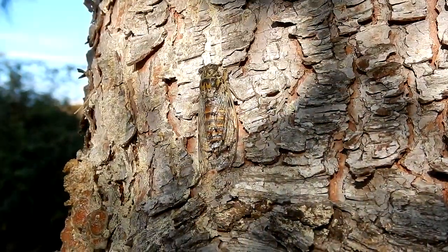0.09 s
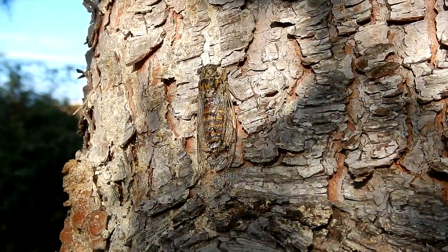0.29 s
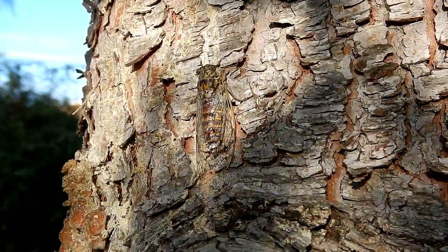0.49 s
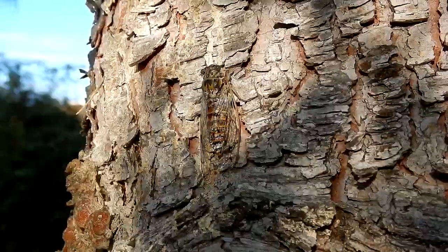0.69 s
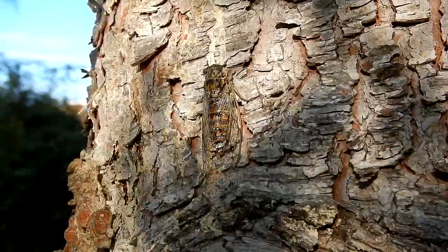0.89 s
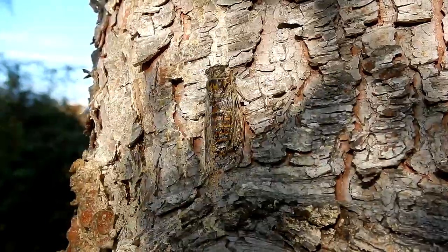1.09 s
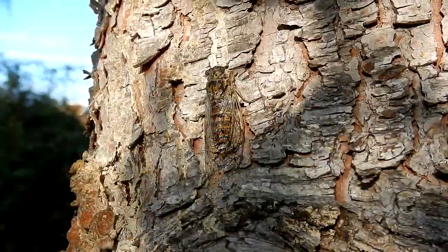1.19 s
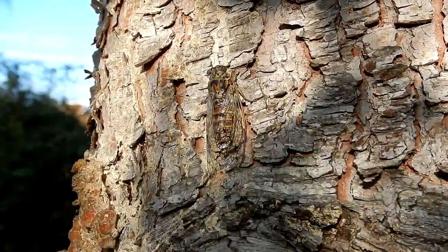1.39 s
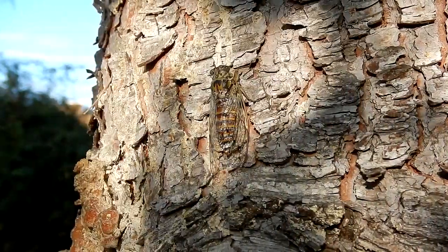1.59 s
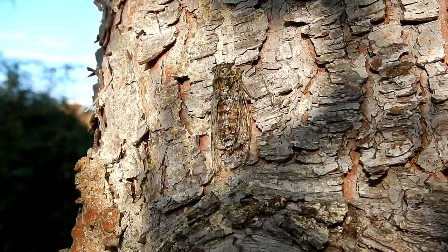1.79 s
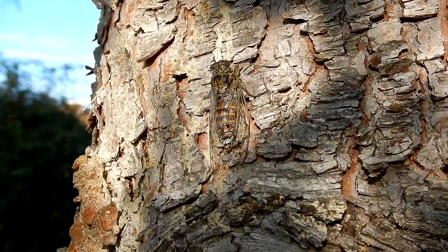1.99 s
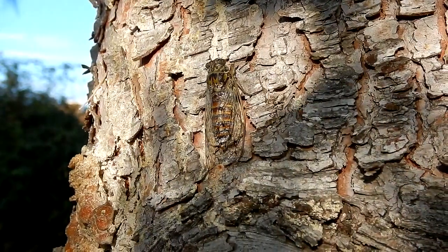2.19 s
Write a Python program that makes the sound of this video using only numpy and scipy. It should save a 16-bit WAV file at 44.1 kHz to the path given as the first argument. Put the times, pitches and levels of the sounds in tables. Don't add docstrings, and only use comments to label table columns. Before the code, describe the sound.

Five brief raspy cicada chirps, close and piercing, evenly spaced over a very faint outdoor haze

```python
import sys
import numpy as np
from scipy import signal
from scipy.fft import rfft, irfft
from scipy.io import wavfile

SR = 44100
rng = np.random.default_rng(int(sys.argv[2]) if len(sys.argv) > 2 else 0)


def persist_wave(psi):
    counts = np.round(np.clip(psi, -1, 1) * 32767).astype(np.int16)
    wavfile.write(sys.argv[1], SR, np.atleast_2d(counts).T)


def makeup_ratio(level_db):
    decades = np.asarray(level_db, float) / 20
    return 10 ** decades


N = 97020

CHIRP_S = [.2100, .6092, 1.0258, 1.4207, 1.8142]
# (length/s, level/dB, belly level/dB, last ring level/dB)
CHIRPS = [
    (0.092, -17, 0.5, -15.5),
    (.087, -17.5, 2, -21),
    (0.093, -17.5, 1, -20),
    (.085, -18, 2.5, -3.5),
    (0.092, -17.5, -1.5, -30.5),
]
HUM_HZ, HUM_T60_S = 5000, .043


def at_hz(points, hz):
    table_hz, values = np.array(points).T
    return np.interp(np.log(hz), np.log(table_hz), values)


def drift(rate_hz):
    r = np.exp(-80 * np.pi * rate_hz / SR)
    slow = signal.lfilter([1], [1, -2 * r, r * r], rng.standard_normal(N // 40 + 2002))
    slow = slow[2000:]
    return np.interp(np.arange(N) / 40, np.arange(len(slow)), slow / slow.std())


def ring(clicks, hz, t60):
    r = makeup_ratio(-60 / (t60 * SR))
    w = 2 * np.pi * hz / SR
    return signal.lfilter([0, np.sin(w)], [1, -2 * r * np.cos(w), r * r], clicks + 1e-18)


def band(x, low_hz, top_hz, order):
    return signal.sosfilt(signal.butter(order, [low_hz, top_hz], "band", fs=SR, output="sos"), x)


def train(s, heights):
    return np.bincount((s * SR).astype(int), heights, N)[:N]


def cicada():
    # (f/Hz, level/dB, t60/s)
    main_modes = [
        (4263, 2.5, .012),
        (4635, 1, .011),
        (5123, 1, .013),
        (5517, -1, 0.012),
        (5525, -3.5, 0.0094),
    ]
    bright_modes = [
        (5806, -11.5, 0.0073),
        (6460, -10, 0.0047),
        (6963, -16, 0.009),
        (7930, -35.5, 0.0064),
    ]
    belly_modes = [
        (1982, -21, 0.01),
        (2269, -19.5, .02),
        (2741, -21, .018),
        (2990, -28, .012),
    ]
    sustain_db, top_hz = -11.5, 8800

    s, db, belly_db, bright_db, tilt_db, spread_db = tymbal_clicks()
    main = body(s, db, main_modes, spread_db, tilt_db) + last_ring()
    hum_kicks = makeup_ratio(db + sustain_db) * rng.standard_normal(len(s))
    main = main + ring(train(s, hum_kicks), HUM_HZ, HUM_T60_S / 2)
    bright = body(s, db + bright_db, bright_modes, spread_db)
    belly = body(s, db + belly_db, belly_modes, spread_db, 1.5 * tilt_db)
    high = band(main + bright, 4430, 7607, order=4)
    high = band(high, 1000, top_hz, order=4)
    low = band(belly, 1700, 3400, order=3)
    return ports(high + low) + echoes(high)


def tymbal_clicks():
    # times (t/ms), then (level/dB, belly/dB, bright/dB); their tilt is 0
    opening_ms = [0, 3.2, 5.5, 9.0, 10.6, 13.8]
    opening = [(-12.5, 2.5, -10), (-4.5, 2, -4), (-10.5, -5.5, -8), (-14, -17.5, -17), (-18, 5, 3),
               (-12.5, -1.5, -5.5)]
    # (level/dB, belly/dB, bright/dB, tilt to high modes/dB)
    rib_ms = [0, 2.2, 4.2, 6.2, 8.2, 10.3]
    ribs = [
        (3, -0.5, -9, -2),
        (0, 2, -5.5, 6.5),
        (1, 6, 8, -1),
        (-2, -8.5, -14.5, -7.5),
        (0, -1.5, -9.5, 6.5),
        (-4, 5, 10.5, 5),
    ]
    cycle_start_ms, cycle_ms, jitter_ms = 15.9, 12.15, .3
    swell_db, swell_ms, end_ms = -5.5, 30, 4.5
    spread_db, opening_spread_db = 2.2, .7

    pattern = [(ms, *dbs, 0) for ms, dbs in zip(opening_ms, opening)] if len(opening[0]) == 3 else [
        (ms, *dbs) for ms, dbs in zip(opening_ms, opening)]
    for k in range(8):
        for ms, dbs in zip(rib_ms, ribs):
            pattern.append((cycle_start_ms + k * cycle_ms + ms, *dbs))
    pattern = np.array(pattern)
    cycling = np.arange(len(pattern)) >= len(opening)
    spread = np.where(cycling, spread_db, opening_spread_db)
    rows = []
    for s, (length, level_db, belly_db, _) in zip(CHIRP_S, CHIRPS):
        ms = pattern[:, 0] + jitter_ms * cycling * rng.standard_normal(len(pattern))
        swell = cycling * swell_db * np.clip(1 - (ms - cycle_start_ms) / swell_ms, 0, 1)
        fade = 20 * np.log10(np.clip((length * 1000 - ms) / end_ms, 1e-6, 1))
        level = pattern[:, 1] + level_db + swell + fade
        rows.append(np.c_[s + ms / 1000, level, pattern[:, 2] + belly_db, pattern[:, 3:], spread])
    return np.vstack(rows).T


def body(s, db, modes, spread_db, tilt_db=0):
    own_db = spread_db * rng.standard_normal((len(modes), len(s)))
    out = 0
    for k, (hz, mode_db, t60) in enumerate(modes):
        strikes = makeup_ratio(db + mode_db + own_db[k] + tilt_db * (k - 2) / 2)
        out = out + (-1) ** k * ring(train(s, strikes), hz, t60)
    return out


def last_ring():
    length, level_db, _, ring_db = np.transpose(CHIRPS)
    last_click_s = CHIRP_S + length - .003
    return ring(train(last_click_s, makeup_ratio(level_db + ring_db + 6.5)), HUM_HZ, HUM_T60_S)


def ports(x):
    # (f/Hz, left minus right level/dB)
    port_lean = [(1500, -2), (3200, -7.5), (3900, 1), (4700, 3), (7000, 6), (8000, 16.5), (9000, -2),
                 (10500, -8)]
    # (f/Hz, left lead/rad)
    port_lead = [(1500, 0), (3500, -.3), (4100, 1.3), (4900, 0.77), (6300, 1.3), (7400, 1.4), (8300, .6),
                 (9000, 0)]
    hz = np.maximum(np.fft.rfftfreq(N, 1 / SR), 1)
    half = makeup_ratio(at_hz(port_lean, hz) / 2) * np.exp(.5j * at_hz(port_lead, hz))
    return irfft(rfft(x) * np.array([half, 1 / half]), N)


def echoes(x):
    t = np.arange(SR // 2) / SR
    quick = makeup_ratio(-28 - 60 * t / .05)
    late = makeup_ratio(-61.5 - 60 * t / .38)
    tail = rng.standard_normal((2, len(t))) * (quick + late) * 0.28
    return signal.fftconvolve(x[None], tail, axes=1)[:, :N]


def wind():
    # (t/s, level/dB)
    gusts = [(0.0, -70.5), (0.29, -62), (0.36, -96), (0.43, -61.5), (0.55, -64.5), (0.73, -62), (0.77, -77),
             (0.88, -78), (1.08, -52.5), (1.11, -75), (1.15, -62.5), (1.19, -82), (1.27, -57),
             (1.79, -75.5), (1.84, -52), (1.97, -85.5), (2.08, -96), (2.2, -58)]
    # (t/s, peak level/dB, f/Hz, left minus right level/dB)
    puffs = [(0.072, -61, 120, -0.5), (0.426, -48.5, 199, -16), (0.468, -50.5, 276, -5),
             (0.478, -52.5, 172, 12), (0.504, -60, 148, 13), (0.618, -55.5, 300.2, -23),
             (0.72, -49.5, 170, -20.5), (1.048, -49.5, 188, -1.5), (1.149, -65.5, 172, -33),
             (1.267, -53.5, 199, -8), (1.298, -56.5, 152.6, -2), (1.411, -52.5, 170, -8.5),
             (1.499, -52.5, 237, -5), (1.584, -57.5, 196, -15), (1.839, -48, 232, -21)]
    puff_cycles, puff_gain_db = 4.4, 2
    lumpy_db, gust_left_db = 5, -4

    gust_db = np.interp(np.arange(N) / SR, *np.transpose(gusts))
    lumps_db = lumpy_db * np.array([drift(14), drift(23)])
    rumble = band(rng.standard_normal((2, N)), 125, 260, order=2)
    out = rumble / rumble.std() * makeup_ratio(gust_db + lumps_db + [[gust_left_db], [0]])
    for s, db, hz, pan_db in puffs:
        push = train(np.array([s]), [makeup_ratio(db + puff_gain_db)])
        thump = band(ring(push, hz, puff_cycles / hz), 70, 450, order=2)
        out += thump * makeup_ratio(pan_db * np.array([[.5], [-.5]]))
    return out


def chorus():
    # (f/Hz, density/dB per Hz)
    chorus_spectrum = [(2500, -8), (2800, -1), (3300, -20.5), (4000, -17.5), (4600, 5), (5600, 0),
                       (7000, -15), (12000, -18.5)]
    return makeup_ratio(-81.5) * banded_noise(chorus_spectrum, 2500, 15000, patchy_db=.7)


def haze():
    # (f/Hz, density/dB per Hz)
    haze_spectrum = [(25, -28.5), (60, -27.5), (150, -10.5), (330, -15.5), (630, -7), (1000, -10.5),
                     (1500, -15.5), (2400, -24.5)]
    return makeup_ratio(-67.5) * banded_noise(haze_spectrum, 25, 2400, patchy_db=1.0)


def banded_noise(spectrum, low_hz, top_hz, patchy_db):
    # (f/Hz, likeness/0-1)
    port_likeness = [(60, 0), (140, 0), (310, 0.68), (700, 1), (1590, 1), (3590, 0.4), (8150, 0)]
    # (f/Hz, left minus right level/dB)
    background_lean = [(60, 7), (160, -2), (430, 0), (1140, -5.5), (3050, -5.5), (8150, 5.5)]
    out = 0
    together = drift(0.92)
    white = rng.standard_normal((2, 2, N))
    for k, low in enumerate(low_hz * 2 ** np.arange(0, np.log2(top_hz / low_hz), 1 / 3)):
        mid, side = band(white[k % 2], low, low * 2 ** (1 / 3), order=2)
        hz = low * 2 ** (1 / 6)
        alike = np.clip(at_hz(port_likeness, hz), 0, 1)
        flicker_db = patchy_db * (1.1 * together + drift(3.3))
        gain = makeup_ratio(at_hz(spectrum, hz) + flicker_db)
        lean = makeup_ratio(at_hz(background_lean, hz) * np.array([[.5], [-.5]]))
        stereo = np.sqrt(1 + alike) * mid + np.sqrt(1 - alike) * side * [[1], [-1]]
        out = out + gain * lean * stereo
    return out / out.mean(axis=0).std()


def scene():
    return cicada() + wind() + chorus() + haze()


def overload(x):
    # (left/dB, right/dB)
    buzz_db = (-26, -10)
    octave_db = (-46, -29)
    fizz_db = (-34.5, -30)
    buzz = -makeup_ratio(np.array([buzz_db]).T) * band(x ** 2, 300, 1300, order=1)
    octave = makeup_ratio(np.array([octave_db]).T) * band(x ** 2, 9300, 11500, order=3)
    fizz = makeup_ratio(np.array([fizz_db]).T) * band(x ** 3, 11500, 16000, order=3)
    return x + buzz + octave + fizz


def low_pass(x):
    return signal.sosfilt(signal.butter(12, 15700, fs=SR, output="sos"), x)


def record(dry):
    notch_hz, notch_width_hz = 2500, 170
    b, a = signal.iirnotch(notch_hz, notch_hz / notch_width_hz, SR)
    return low_pass(signal.lfilter(b, a, overload(dry)))


dry = scene()
out = record(dry)
persist_wave(out)
```